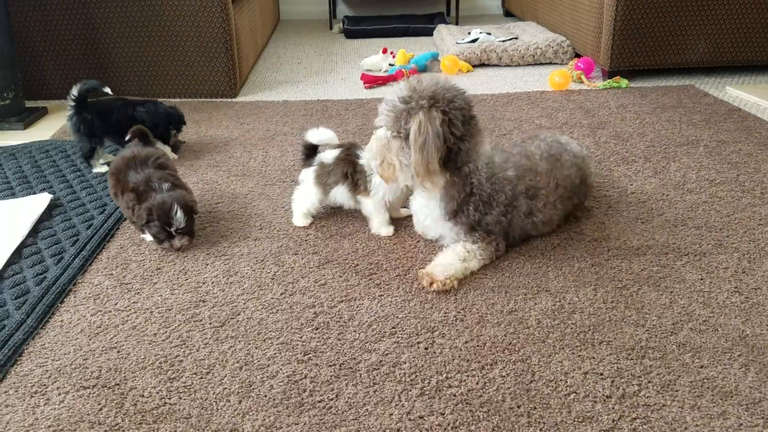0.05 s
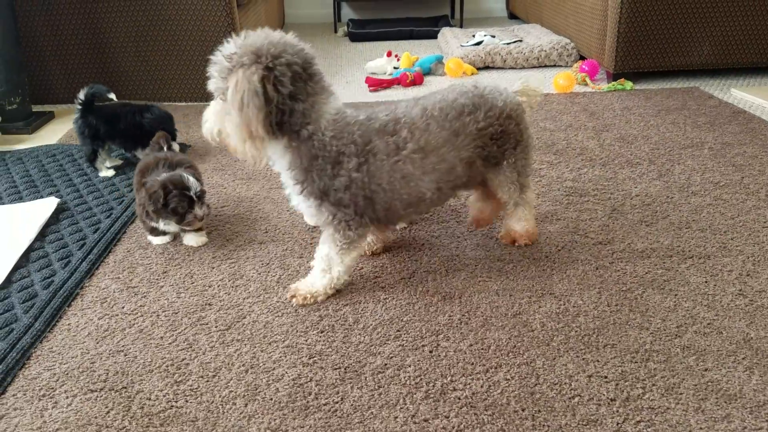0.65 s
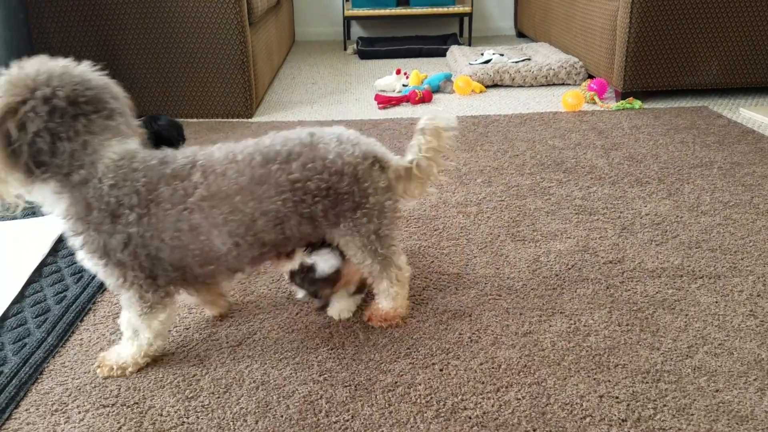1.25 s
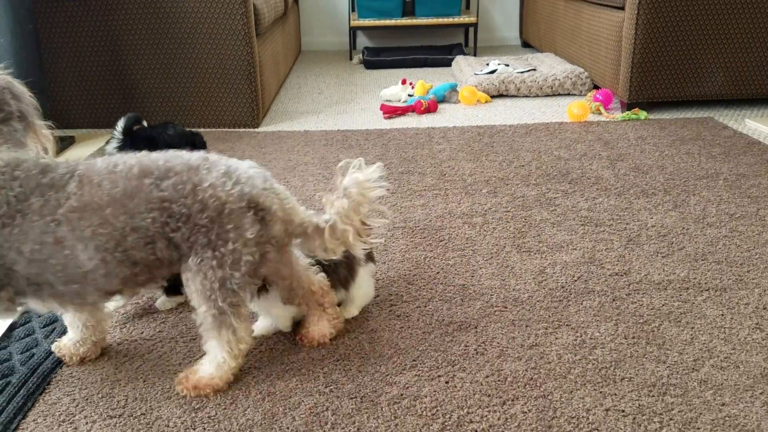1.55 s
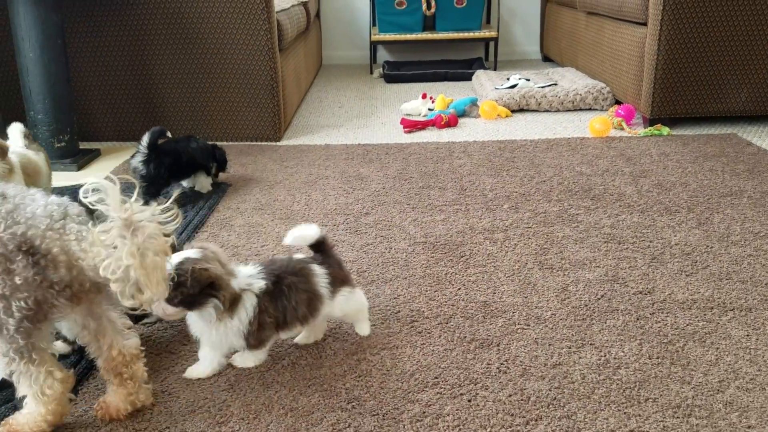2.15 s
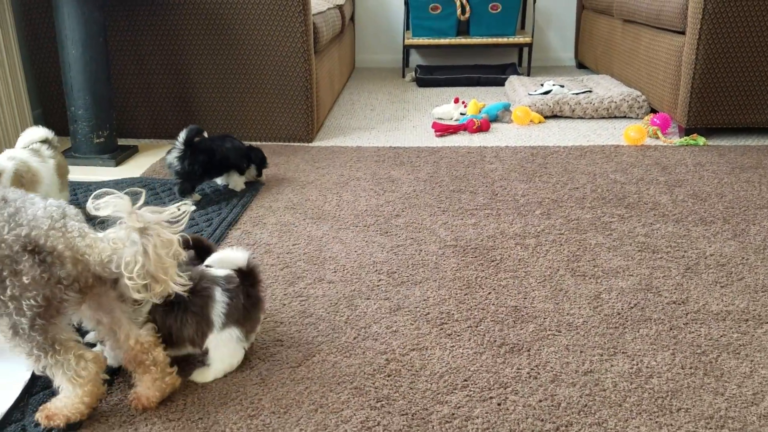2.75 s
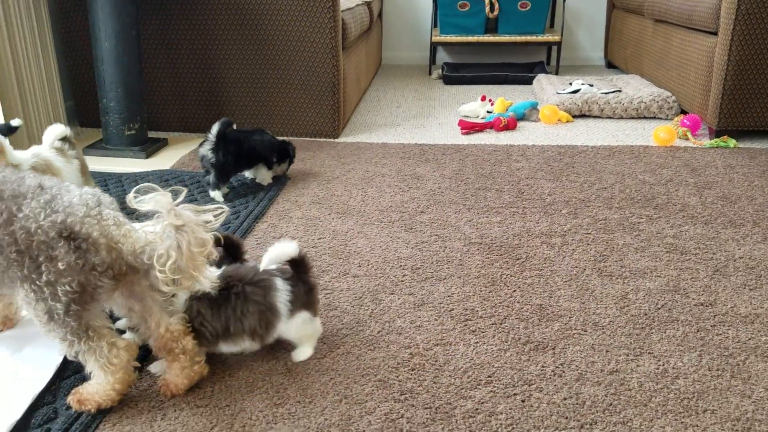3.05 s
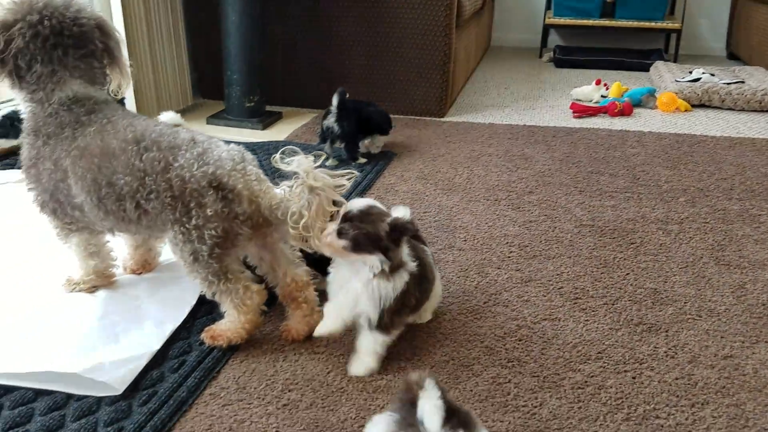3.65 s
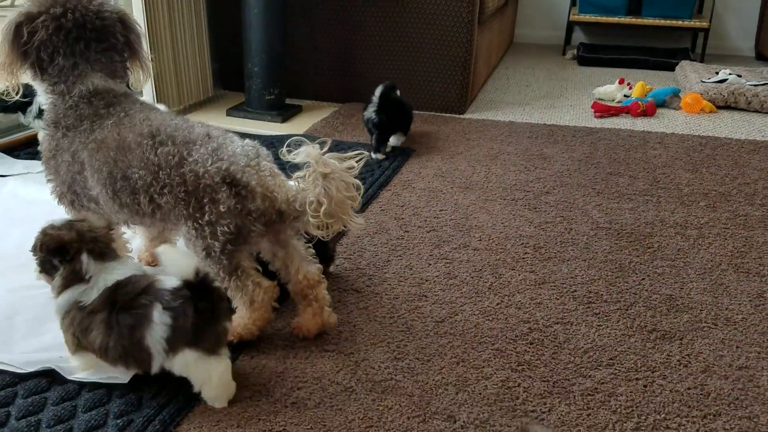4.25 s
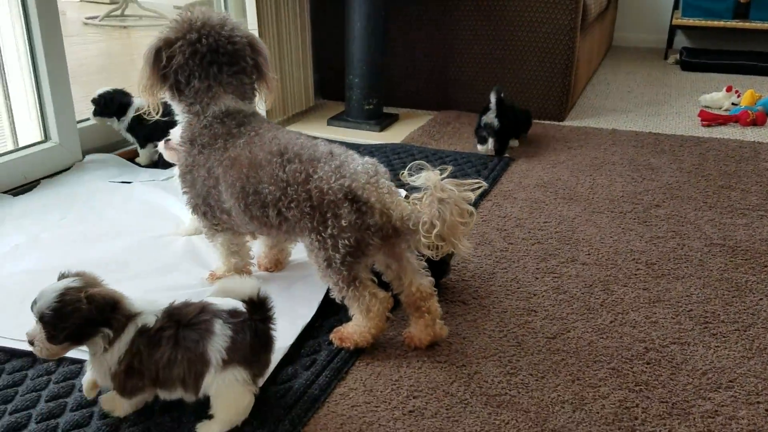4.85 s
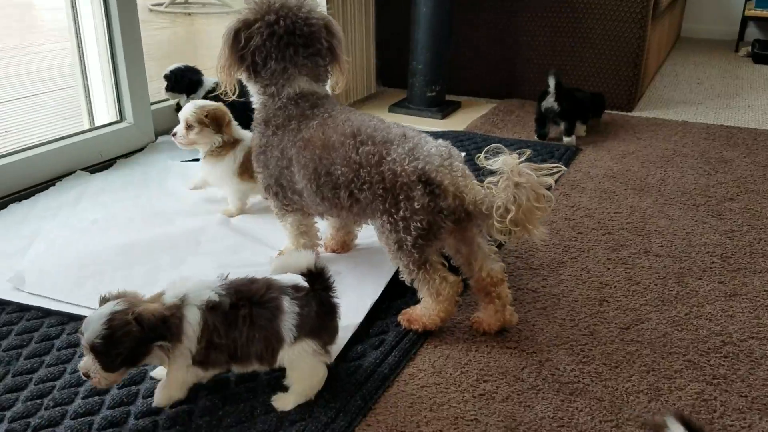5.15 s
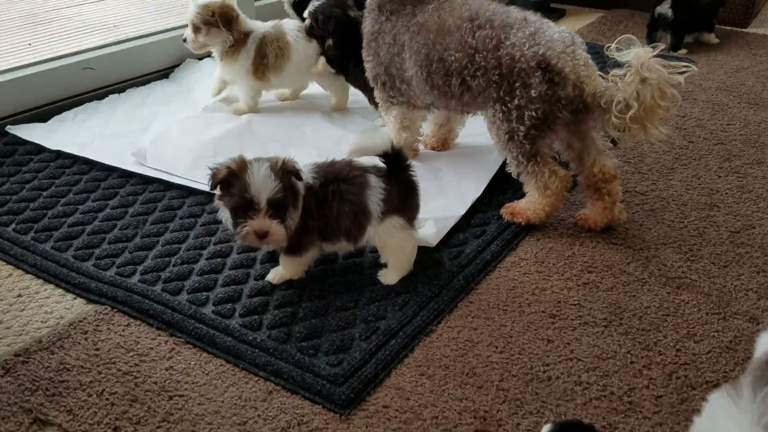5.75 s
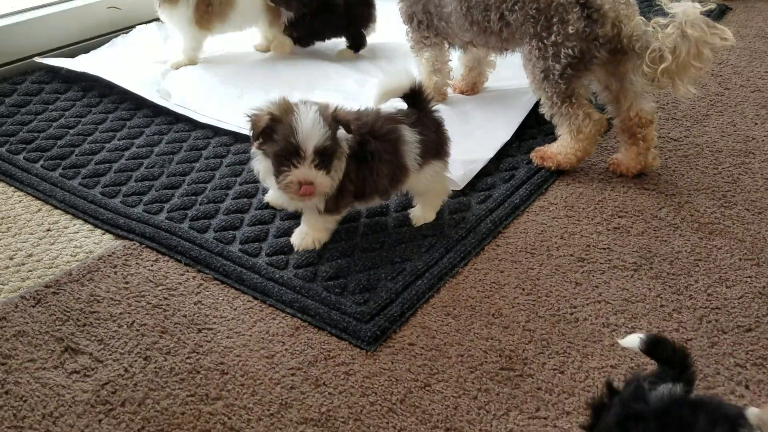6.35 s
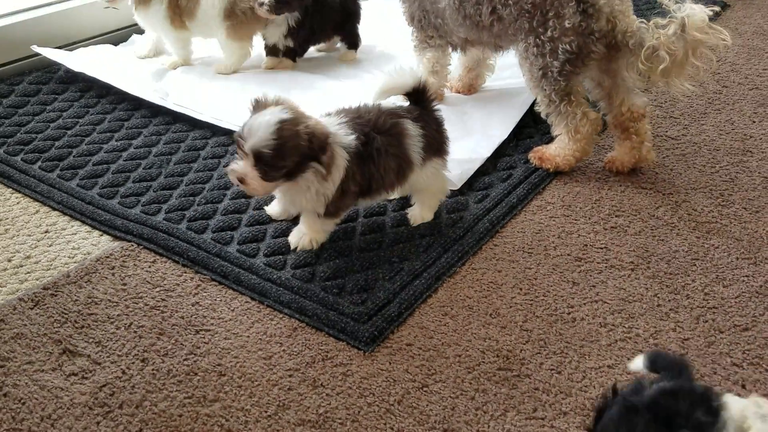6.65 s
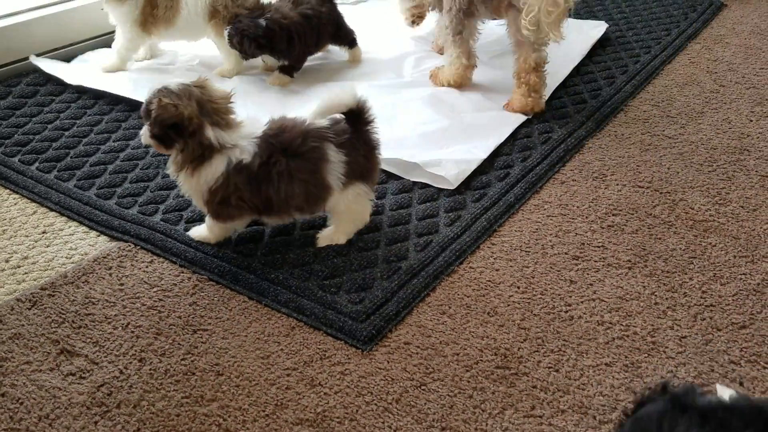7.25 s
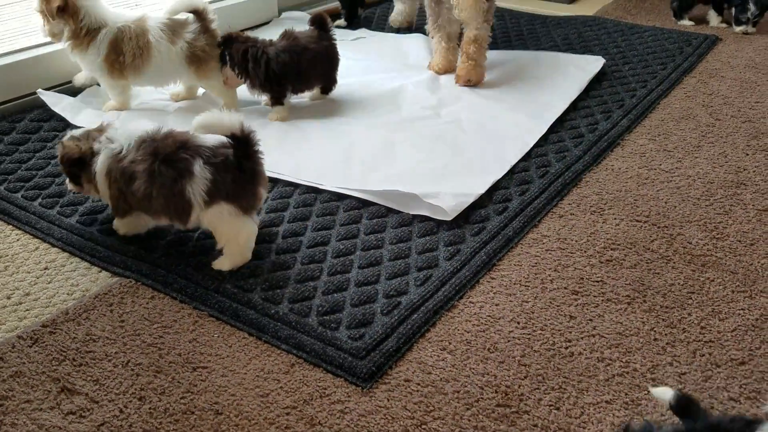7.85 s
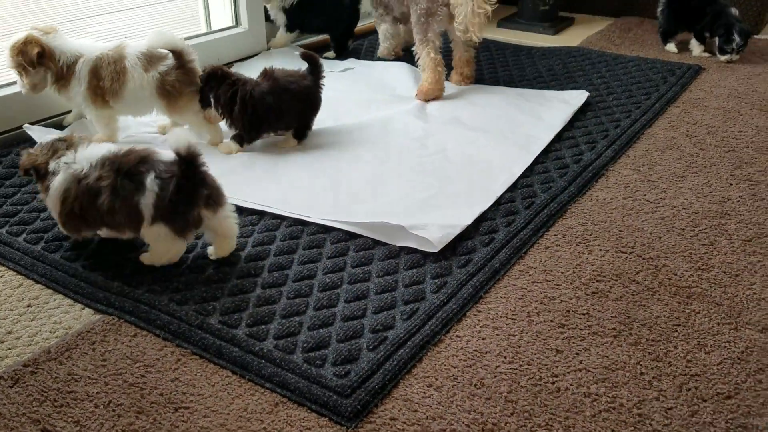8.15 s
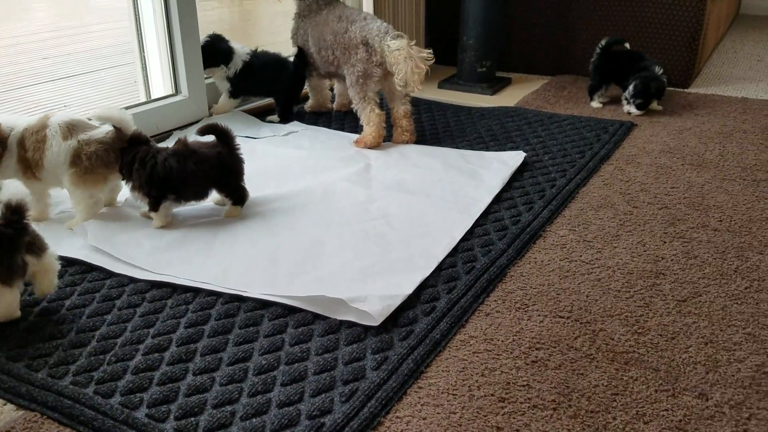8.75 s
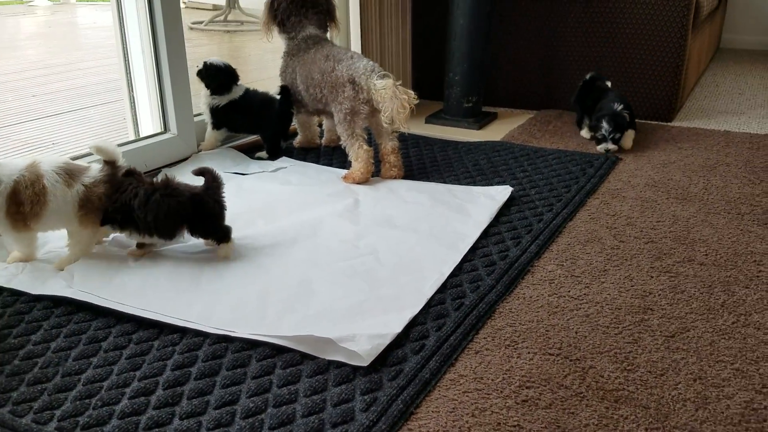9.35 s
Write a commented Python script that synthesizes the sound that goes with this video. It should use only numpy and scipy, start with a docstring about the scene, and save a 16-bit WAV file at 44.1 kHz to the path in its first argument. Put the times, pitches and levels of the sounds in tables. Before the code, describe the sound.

A large sheet of paper crinkles under dogs' paws in a living room with a brief echo. At first there are only quiet pats and scuffs on carpet. Scattered rustles follow and build into a nearly continuous run of crisp crackles and snapping creases, with occasional dull paw thuds underneath. The last steps are lighter and fade away. The microphone is near the floor activity, with a faint hush and appliance hum behind.

```python
"""Puppies on a sheet of paper

Puppies and their mother walk over carpet and onto a big sheet of paper in a living room.
Paws thud and scuff, coats brush, claws catch, and a small piece of metal clinks in its modes.
Each paw buckles the sheet in a burst of tiny clicks, and now and then a crease snaps through.
The room reverberates briefly over a faint hush and hum."""
import sys
import numpy as np
from scipy import signal
from scipy.fft import rfft, irfft
from scipy.io import wavfile
from scipy.ndimage import uniform_filter1d

SR = 44100
rng = np.random.default_rng(int(sys.argv[2]) if len(sys.argv) > 2 else 0)


def master(y):
    """Save y as 16-bit WAV."""
    cut = np.clip(np.atleast_2d(y).T, -1, 1)
    pcm = np.round(cut * 32767)  # scale
    wavfile.write(sys.argv[1], SR, pcm.astype(np.int16))


N = 418950
BAND_LIMIT_HZ = 16050
USUAL_PRESS_DB = -40


def amp(db):
    """Amplitude ratio of a level in decibels."""
    return 10 ** (np.asarray(db) / 20)


def unit(x):
    """Normalisation to an rms of 1."""
    return x / np.sqrt(np.mean(abs(x) ** 2) + 1e-20)


def axes(size):
    """Time and frequency axes of a Fourier pair."""
    return np.arange(size) / SR, np.fft.rfftfreq(size, 1 / SR)


def read(points, hz):
    """Interpolation on a log-frequency axis."""
    f, value = np.transpose(points)
    return np.interp(np.log(hz + 1), np.log(f + 1), value)


def hump(hz, centre_hz, octaves):
    """Gaussian passband in log frequency."""
    return np.exp(-.5 * (np.log2((hz + 1) / centre_hz) / octaves) ** 2)


def swell(rise_s, decay_s, size=SR):
    """Envelope of exponential growth and decay."""
    t = np.arange(size) / SR
    return (1 - np.exp(-t / rise_s)) * np.exp(-t / decay_s)


def add(mix, s, sound):
    """Superposition of a sound starting at time s."""
    part = mix[:, max(round(s * SR), 0):][:, :sound.shape[-1]]
    part += sound[..., :part.shape[1]]


# left-right correlation of the room's field: f/Hz, coefficient
COHERENCE = [(100, 0.86), (350, 0.76), (700, 0.51), (1200, -0.41), (2000, 0.17), (16000, -0.08)]
def diffuse(pair, hz):
    """Spatial coherence: two close points in a diffuse field are alike at long wavelengths."""
    same = np.clip(read(COHERENCE, hz), -1, 1)
    return np.array([pair[0], same * pair[0] + np.sqrt(1 - same ** 2) * pair[1]])


def noise(spectrum):
    """Diffuse noise of a given spectrum and unit rms."""
    _, hz = axes(N)
    white = diffuse(rfft(rng.standard_normal((2, N))), hz)
    return unit(irfft(white * amp(read(spectrum, hz)), N))


# spectrum of the quiet room: f/Hz, level/dB
HUSH_SPECTRUM = [(25, -13), (50, -19), (61, -0.5), (72, -14), (115, -4.5), (160, -9), (460, -12.5),
                 (840, -14.5), (1480, -15), (3000, -21), (5000, -25), (9070, -30), (13000, -24.5),
                 (16000, -22.5)]
def hush():
    """Stationary noise: room air, with a low spectral peak for an appliance's hum."""
    return amp(-67.5) * noise(HUSH_SPECTRUM)


# paws landing on the floor: t/s, level/dB, centre f/Hz
THUDS = [(0.023, -49, 150), (.532, -60, 166), (1.069, -56.5, 164), (1.143, -56, 380), (1.218, -48.5, 330),
         (1.406, -52, 190), (2.205, -54, 113), (2.519, -45, 170), (3.848, -49, 335), (3.881, -43, 310),
         (3.913, -48.5, 280), (3.953, -42, 280), (4.042, -43.5, 160), (4.736, -49.5, 403),
         (5.127, -52, 326), (5.592, -56, 299), (6.443, -51, 286), (6.881, -48, 382), (7.306, -40, 373),
         (8.023, -50, 113), (9.226, -51.5, 270)]
def thud(level_db, centre_hz, size=8192):
    """Damped impact: a soft pad is too light for deep bass, and the carpet absorbs the treble."""
    _, hz = axes(size)
    phases = np.exp(2j * np.pi * rng.random(len(hz)))
    knock = irfft(phases * hump(hz, centre_hz, octaves=.61))
    knock *= swell(rise_s=.002, decay_s=.014, size=size)
    knock = signal.sosfilt(signal.butter(2, [85, 520], "bandpass", fs=SR, output="sos"), knock)
    return amp(level_db) * knock / abs(knock).max()


# spectrum of rubbed carpet: f/Hz, level/dB
CARPET_SPECTRUM = [(30, -28), (48, -25), (62, -7.5), (115, 4), (170, -6), (330, 0), (600, -10), (1500, -11),
                   (6000, -26.5)]
def scuffs():
    """Friction noise: each press and landing rubs the carpet; incoherent sources add in power."""
    presses = [(s, -63 + .5 * (db - USUAL_PRESS_DB)) for s, db, *_ in PRESSES]
    landings = [(s, db - 16.5) for s, db, _ in THUDS]
    power = np.zeros((1, N))
    for s, db in presses + landings:
        add(power, s, (amp(db) * swell(rise_s=.0035, decay_s=.11)) ** 2)
    return np.sqrt(power) * noise(CARPET_SPECTRUM)


# the mother's steps: t/s, level/dB
FOOTFALLS = [(.024, -65), (.532, -65), (1.068, -75), (2.205, -69)]
def footfall(level_db, mode_hz=58.3):
    """Free vibration: the mother's weight excites the floor's lowest mode."""
    mode = np.sin(2 * np.pi * mode_hz * np.arange(SR) / SR)
    return amp(level_db) * swell(rise_s=.0035, decay_s=.095) * mode


# coats brushing past each other: middle t/s, level/dB, half duration/s
BRUSHES = [(0.04, -75, .03), (0.302, -67.5, 0.12), (1.295, -66.5, 0.046)]
# spectrum of rubbed fur: f/Hz, level/dB
FUR_SPECTRUM = [(300, 1), (1000, 1), (3000, -5), (6000, -5), (10000, -9), (15000, -6)]
def fur():
    """Sliding friction of coat on coat gives soft swishes of noise."""
    t, _ = axes(N)
    envelope = sum(amp(db) * np.exp(-((t - s) / half) ** 2) for s, db, half in BRUSHES)
    return noise(FUR_SPECTRUM) * envelope


def dispersion(hz, lag_s):
    """Bending waves are slower in the bass: treble arrives first; lag_s sets how far the bass trails."""
    return np.exp(-2j * np.pi * lag_s * (2 * np.sqrt(1000 * hz) - hz / 4))


# claws catching in the carpet: t/s, level/dB, centre f/Hz, width/octaves, left-right/dB
CLAWS = [(0.363, -53, 2420, .35, -8), (0.371, -57, 2400, .2, -4), (0.384, -57, 2870, 0.18, -9)]
# the loudest creases snapping through: columns as in CLAWS
CREASES = [(2.0724, -33.5, 7300, 2, 8), (2.1169, -34, 8700, 1.2, 6), (3.339, -40, 3350, 0.53, -1),
           (3.771, -40.5, 5600, .35, -2), (4.2577, -44, 4330, .7, -4), (4.412, -39, 5070, .7, -2),
           (4.5947, -31, 5800, 0.44, -6), (4.795, -39, 14000, 1.8, 2), (4.939, -37, 10000, 1.5, 7),
           (5.1398, -37, 3200, 1, 1), (5.2009, -33.5, 3400, 2, -4), (5.3707, -37, 12900, 1.6, -3),
           (5.4154, -30, 12200, 0.35, 2), (5.586, -33, 8700, 2.3, -6), (5.703, -34, 8700, 1.6, -8),
           (5.8025, -33, 12800, 1.9, 0), (6.0507, -28, 7300, 2.2, -12), (6.0855, -30, 9800, 1.1, -2),
           (6.3013, -39.5, 10900, 1.2, 7), (6.415, -33, 14000, 1.5, -2), (6.498, -33, 7950, 1.5, -5),
           (6.515, -32, 6500, .35, -7), (6.5461, -28.5, 11700, 2.1, -6), (6.751, -34, 7340, 2.6, -1),
           (6.9274, -32, 6560, 0.65, -2), (7.0672, -32, 10500, 1.7, 2), (7.1987, -32.5, 5960, 1.8, -10),
           (7.3143, -33.5, 7800, 2.4, 0), (7.3809, -27.5, 14000, 1.8, -7), (7.596, -34.5, 4500, 0.63, 4),
           (7.6367, -32, 6000, .7, -7), (7.7719, -30, 8460, .8, -8), (7.977, -42.5, 2600, 2, -15),
           (8.097, -31.5, 6550, 0.58, -7), (8.1937, -35.5, 7330, 0.65, -2), (8.3576, -51, 4800, 0.69, 3),
           (8.5326, -38, 5400, 1.3, 0), (8.684, -37.5, 8800, 1.3, -5), (8.7427, -41.5, 8800, 1.2, -4),
           (9.0543, -39.5, 5370, 0.76, -9)]
def snap(level_db, centre_hz, octaves, side_db, size=2048):
    """Sudden elastic release: a claw or crease gives a dispersed crack, treble first."""
    t, hz = axes(size)
    attack = 1 - np.exp(-t / .00011)
    decay = np.exp(-t / .0011) + amp(-20) * np.exp(-t / .0062)  # brief ring, faint flutter
    burst = rfft(rng.standard_normal((2, size)) * attack * decay)
    colour = hump(hz, centre_hz, octaves) * (hz < BAND_LIMIT_HZ)
    crack = irfft(burst * colour * dispersion(hz, lag_s=.002))[:, :size // 2]
    crack *= np.sqrt(.0015 * SR) / np.linalg.norm(crack, axis=1, keepdims=True)  # unit power over 1.5 ms
    pan = unit(amp(np.array([[.5], [-.5]]) * side_db))
    return amp(level_db) * pan * crack


# modes of a small piece of metal: f/Hz, level/dB, T60/s
METAL_MODES = [(2410, -1, .25), (3730, -2.5, 0.26), (5103, -10, .1)]
def clink():
    """Modal ringing: lightly touched metal sounds a few damped, inharmonic partials."""
    t, _ = axes(SR // 2)
    modes = [amp(db - 60 * t / t60) * np.sin(2 * np.pi * hz * t) for hz, db, t60 in METAL_MODES]
    return amp(-68.5) * sum(modes)


def buckle(force, per_s, spread_db, delay_s, facets, ring_s=.00027, max_lag_s=.003497):
    """Buckling: facets flip at random, each with its own ring and path. Gives left and right spectra."""
    size = len(force)
    t, hz = axes(size)
    chance, strength, facet = rng.random((3, size))
    heights = amp(spread_db * np.minimum(-np.log(1 - strength), 3.5))  # truncated power law
    flips = heights * rng.choice([-1, 1], size) * (chance < per_s / SR) * force
    flips *= np.linalg.norm(force) / (np.linalg.norm(flips) + 1e-9)
    clicks = flips * ((facet * facets).astype(int) == np.arange(facets)[:, None])  # one row a facet
    rings = rng.standard_normal((facets, 256)) * np.exp(-t[:256] / ring_s)
    rings /= np.linalg.norm(rings, axis=1, keepdims=True)
    left = rfft(clicks) * rfft(rings, size) * dispersion(hz, max_lag_s * rng.random((facets, 1)))
    right_delay_s = delay_s + .00011 * rng.standard_normal((facets, 1))
    right = left * np.exp(-2j * np.pi * hz * right_delay_s)
    return np.array([left.sum(0), right.sum(0)])


# paws pressing the paper: t/s, level/dB, duration/s, crispness/dB
PRESSES = [(1.67, -36.5, 0.054, -1.0), (1.955, -46.5, 0.03, -9), (1.978, -41.5, 0.073, -7),
           (2.023, -37.5, 0.044, -16), (2.076, -35.5, 0.036, -12), (2.113, -35.5, 0.052, -6),
           (2.222, -36, 0.062, -11.5), (2.433, -58, 0.03, 0.0), (2.834, -40, 0.055, -10.0),
           (3.017, -52, 0.057, -17), (3.231, -48, 0.076, -4.0), (3.335, -43.5, 0.032, -2.5),
           (3.424, -48, 0.035, -1), (3.697, -38.5, 0.07, -11.5), (3.798, -50.5, 0.042, 9),
           (3.899, -35, 0.077, -6.5), (3.98, -43, 0.12, -3), (4.106, -41, 0.1, -12.5),
           (4.236, -41.0, 0.076, -1), (4.407, -44.5, 0.12, 1), (4.594, -43.5, 0.05, 4),
           (4.651, -42.5, 0.08, -2.5), (4.784, -39.5, 0.055, -1.5), (4.866, -32, 0.045, -6.5),
           (4.927, -41, 0.12, -1), (5.039, -43, 0.11, 0), (5.121, -34.5, 0.078, -2.5),
           (5.184, -39.5, 0.13, -9), (5.282, -38, 0.039, 0), (5.364, -39, 0.044, -3),
           (5.404, -41, 0.08, -2), (5.502, -43, 0.13, -7), (5.57, -28, 0.073, -4.5),
           (5.656, -35.5, 0.09, -3.5), (5.797, -40.5, 0.095, -9), (5.929, -30.5, 0.092, -4),
           (6.046, -31.5, 0.047, 1), (6.109, -38.5, 0.06, -0.5), (6.157, -36.5, 0.07, 0),
           (6.225, -37.5, 0.11, -3.5), (6.361, -41.5, 0.082, 4), (6.427, -30.5, 0.057, -4.5),
           (6.498, -40.5, 0.065, 0), (6.545, -35, 0.051, -1.5), (6.611, -45, 0.051, -1),
           (6.693, -41.5, 0.054, -8), (6.732, -37.0, 0.05, -1.5), (6.877, -36, 0.07, -4.5),
           (6.936, -30, 0.053, 0.5), (7.016, -40, 0.098, 3.5), (7.141, -34.5, 0.066, -10),
           (7.189, -41, 0.094, -1.0), (7.262, -38, 0.13, -1.0), (7.374, -34, 0.061, -4.5),
           (7.439, -35, 0.068, -5), (7.544, -41.5, 0.13, -3.0), (7.626, -38, 0.064, 1),
           (7.722, -43.5, 0.16, 1), (7.84, -35, 0.066, -6), (8.092, -43.5, 0.05, 9.5),
           (8.192, -40, 0.063, -1.5), (8.383, -43.5, 0.055, -5), (8.527, -48, 0.079, -0.5),
           (8.655, -51.5, 0.13, 3), (8.975, -50.0, 0.056, -6), (9.046, -60.5, 0.071, 6),
           (9.201, -57.5, 0.2, -8), (9.316, -52.5, 0.064, -0.5), (9.469, -56, 0.08, -6)]
# spectrum of crushed paper: f/Hz, level/dB
PAPER_SPECTRUM = [(30, -50), (60, -32), (110, -12.5), (220, -5), (370, -1.5), (500, -5.5), (750, -2.5),
                  (1300, -2), (2500, 1), (4500, -0.5), (8200, -2), (9300, -9.5), (11500, -5), (13500, -3),
                  (16000, -12)]
# bass gain as the sheet flaps: t/s, level/dB
FLAP_BASS = [(1.7, 0.5), (2.2, -4), (3.7, 2.5), (4.6, 0.5), (5.6, 0), (6.1, -3.5), (6.5, -1), (7.4, -2.5),
             (7.9, 0), (9, 1.5)]
# lag of the right channel as the paws move along the sheet: t/s, delay/ms
RIGHT_DELAY = [(2, 0.42), (4.2, 0.26), (5.3, 0.27), (6.5, 0.11), (8.5, .18)]
def press(s, level_db, length_s, crisp_db, rise_s=.0048, size=16384):
    """Crackling noise: a paw buckles the sheet into a dense rustle, with sparser ticks in the treble."""
    t, hz = axes(size)
    force = (1 - np.exp(-t / rise_s)) * np.exp(-(t / length_s) ** 2)
    force *= amp(1.7 * unit(uniform_filter1d(rng.standard_normal(size), 260)))  # uneven clumps
    delay_s = np.interp(s, *np.transpose(RIGHT_DELAY)) * .001
    rustle = buckle(force, per_s=6000, spread_db=3, delay_s=delay_s, facets=10)
    ticks = buckle(force, per_s=260, spread_db=4.5, delay_s=delay_s, facets=4)
    tick_share = .61 * read([(2500, .012), (5000, .72), (10000, .44)], hz)
    crush = np.sqrt(1 - tick_share) * rustle + np.sqrt(tick_share) * ticks
    bass_db = np.interp(s, *np.transpose(FLAP_BASS)) * read([(800, 1), (1700, .077)], hz)
    treble_db = crisp_db * read([(2800, .13), (9500, .77)], hz)
    colour = unit(amp(read(PAPER_SPECTRUM, hz))) * amp(bass_db + treble_db)
    return amp(level_db) * irfft(crush * colour)


def small_creases(centre_hz=5300, octaves=1.1, spread_db=3):
    """Snap-through: one crease flips per press, louder if that is hard or crisp. Rows as in CREASES."""
    moments = rng.random(len(PRESSES))
    chances = rng.standard_normal((len(PRESSES), 2)).clip(-2, 2)
    rows = []
    for (s, db, length_s, crisp_db), moment, (size, pitch) in zip(PRESSES, moments, chances):
        level_db = -44 + .54 * (db - USUAL_PRESS_DB + crisp_db) + spread_db * size
        rows.append((s + length_s * moment, level_db, centre_hz * 2 ** (.72 * pitch), octaves, 0))
    return rows


# the sheet stirring between presses: t/s, level/dB
STIR_LEVEL = [(1.85, -61), (2.4, -65), (2.65, -78), (3.1, -62.5), (4.5, -54.5), (6.5, -52), (8, -54.5),
              (8.9, -60.5), (9.4, -62)]
def stirrings(count=52, length_s=.15, spread_db=1.5, crisp_db=-4):
    """Shifting load: the dogs' weight buckles the sheet faintly and irregularly. Rows as in PRESSES."""
    jitter, size = rng.random((count, 2)).T
    start, end = STIR_LEVEL[0][0], STIR_LEVEL[-1][0]
    times = start + (end - start) * (np.arange(count) + .5 * jitter) / count
    levels = np.interp(times, *np.transpose(STIR_LEVEL)) + spread_db * (2 * size - 1)
    return [(s, db, length_s, crisp_db) for s, db in zip(times, levels)]


# level difference from the sheet lying to one side: f/Hz, left-right/dB
SIDE_LEVEL = [(200, -0.3), (700, -1), (1300, -4), (2400, -4.5), (4400, -6), (6500, -10), (8500, -1.5),
              (15000, -2.5)]
def off_axis(x):
    """Acoustic shadow: the right side faces the sheet, and the left loses the upper middle."""
    _, hz = axes(N)
    side_db = read(SIDE_LEVEL, hz)
    gains = amp(np.array([side_db, -side_db]) / 2)
    return irfft(rfft(x) * gains / np.sqrt((gains ** 2).mean(0)), N)


# reverberation time of the room: f/Hz, T60/s
ROOM_T60 = [(120, 1), (600, 0.78), (2000, 0.46), (5000, 0.38), (13000, 0.3)]
def room(x, gap_s=.0095, build_s=.0031, echoes=14, size=32768):
    """Reverberation: early reflections from floor and window, then a tail whose treble dies first."""
    t, _ = axes(size)
    taps = rng.standard_normal((2, size)) * (1 - np.exp(-np.maximum(t - gap_s, 0) / build_s))
    echo_gain = amp(-7) * np.sqrt(.082 * SR / echoes)
    for side in taps:
        arrivals = (rng.uniform(.002, .026, echoes) * SR).astype(int)
        side[arrivals] += echo_gain * rng.choice([-1, 1], echoes)
    hz, frame_s, bands = signal.stft(taps, SR, nperseg=256)
    t60 = read(ROOM_T60, hz)[:, None]
    bands = diffuse(bands, hz[:, None]) * amp(-60 * frame_s / t60) / np.sqrt(t60)
    _, response = signal.istft(bands, SR, nperseg=256)
    response /= np.linalg.norm(response, axis=1, keepdims=True)
    return signal.fftconvolve(x[:1], response, axes=1)[:, :N]


def roaming_room(x, places=7, fade_s=.11):
    """Reflections depend on source position: the moving paws cross-fade through a cycle of echoes."""
    turn = np.arange(N) / SR / fade_s
    offsets = [(turn - k) % places - 1 for k in range(places)]
    return sum(room(x * np.cos(np.pi / 2 * np.clip(offset, -1, 1))) for offset in offsets)


def scene():
    """Superposition of direct and reverberant sound from paper, paws and metal, with fur and hush."""
    crinkle, cracks, floor = np.zeros((3, 2, N))
    for s, *row in PRESSES + stirrings():
        add(crinkle, s, press(s, *row))
    for s, *row in CREASES + small_creases():
        add(cracks, s, snap(*row))
    for s, *row in CLAWS:
        add(floor, s, snap(*row))
    for s, *row in THUDS:
        add(floor, s, thud(*row))
    for s, db in FOOTFALLS:
        add(floor, s, footfall(db))
    add(floor, .532, clink())
    paper_reverb = roaming_room(crinkle + amp(.5) * cracks)
    paper = off_axis(amp(-2) * crinkle + amp(-3) * paper_reverb) + amp(1.5) * cracks
    paws = amp(-1) * floor + amp(-6) * room(floor) + scuffs()
    return paper + paws + fur() + hush()


def record(dry):
    """Band limiting by a linear-phase low-pass filter."""
    lowpass = signal.firwin(511, BAND_LIMIT_HZ, window=("kaiser", 9), fs=SR)
    return signal.oaconvolve(dry, lowpass[None], "same")


dry = scene()
out = record(dry)
master(out)
```